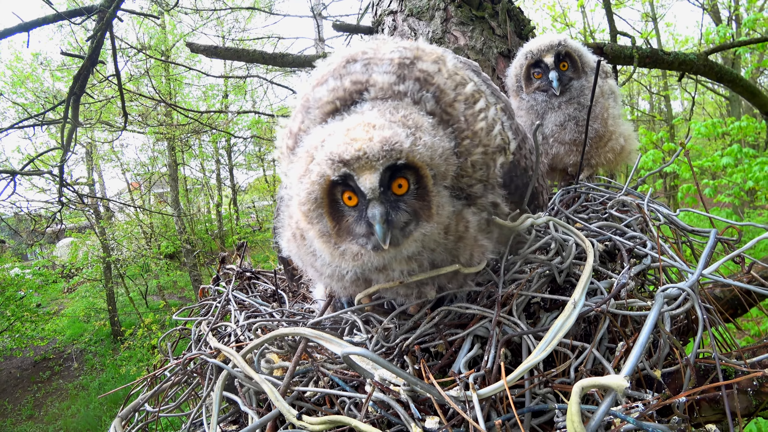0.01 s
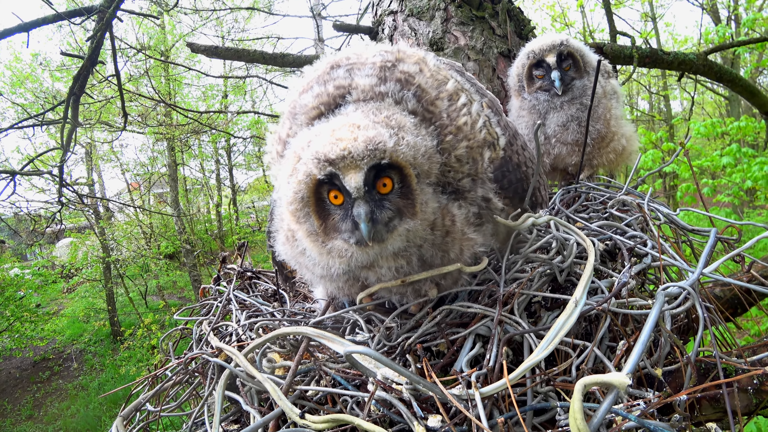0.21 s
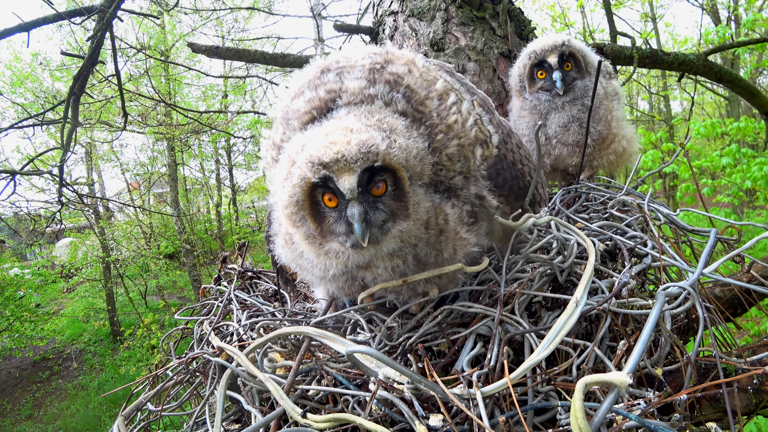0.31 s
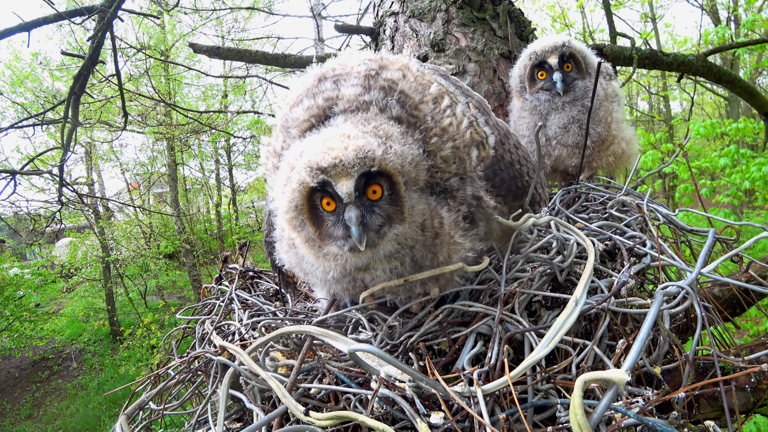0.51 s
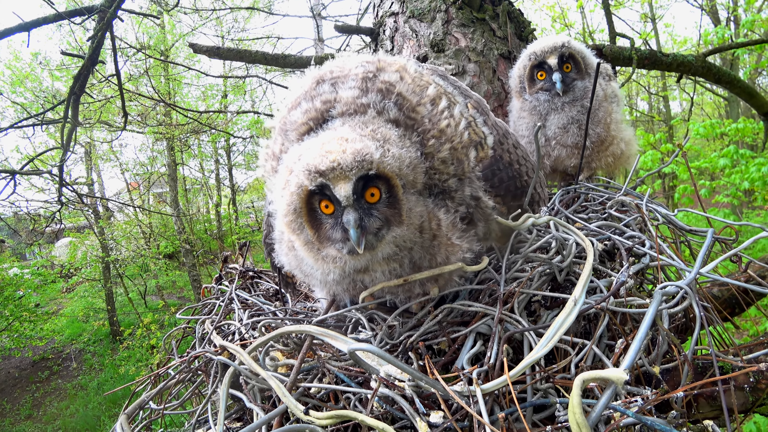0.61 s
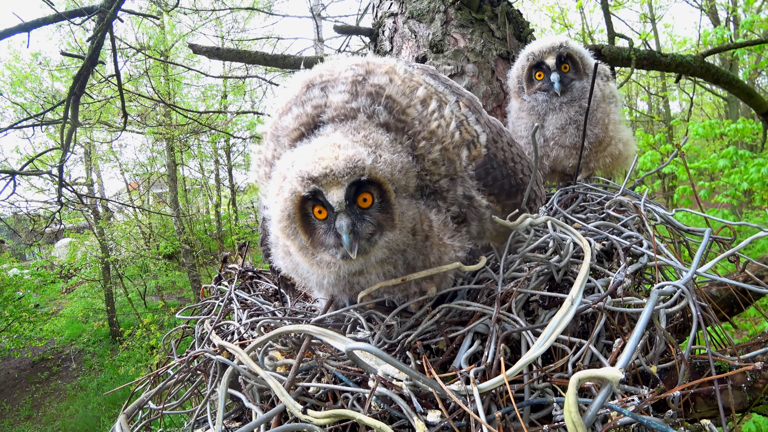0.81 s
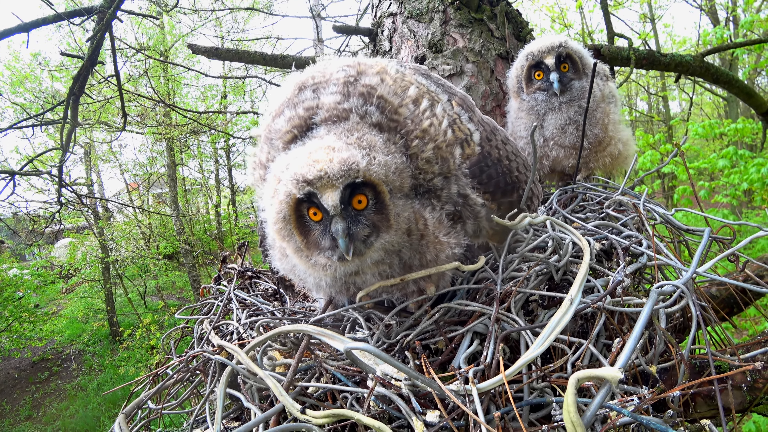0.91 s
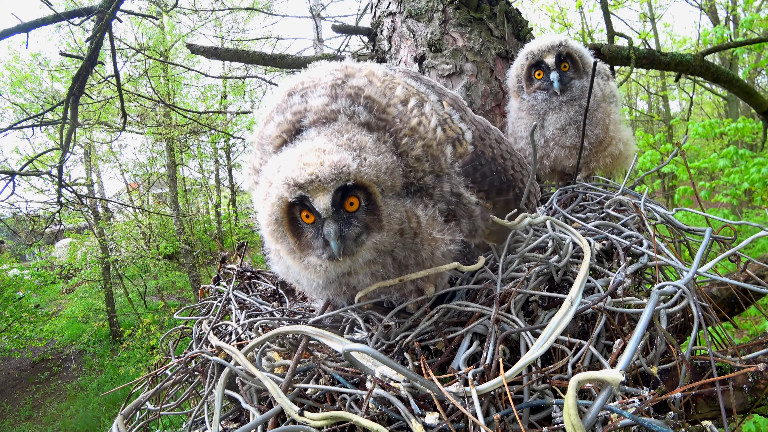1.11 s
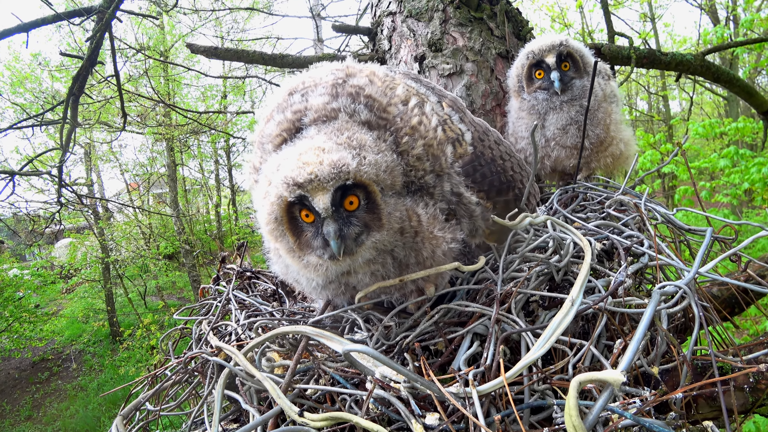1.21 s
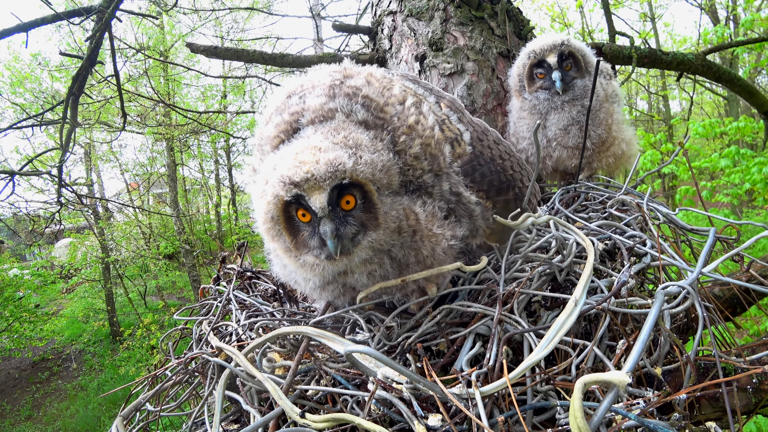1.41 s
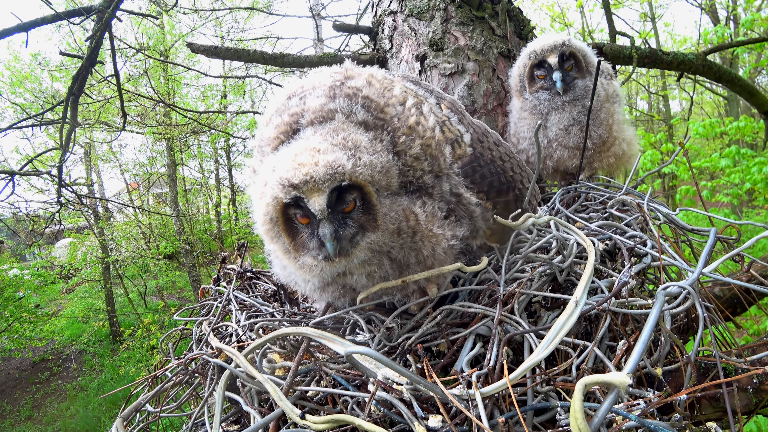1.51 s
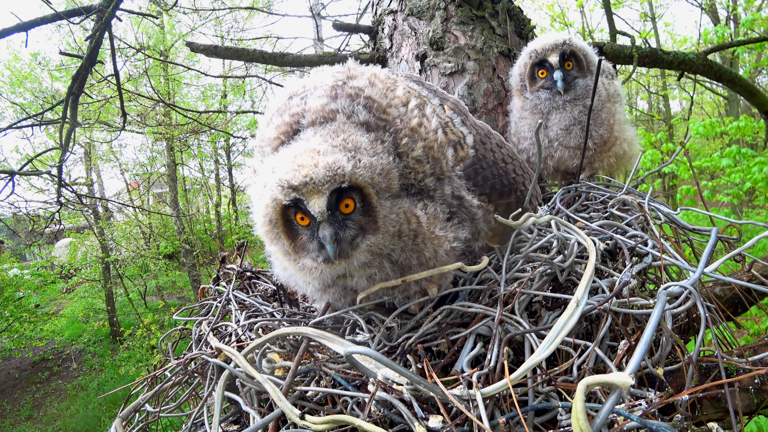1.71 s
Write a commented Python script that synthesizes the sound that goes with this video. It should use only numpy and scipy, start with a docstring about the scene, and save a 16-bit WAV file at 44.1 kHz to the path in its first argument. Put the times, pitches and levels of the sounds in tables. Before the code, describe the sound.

Close owl chick hissing once between two sharp bill snaps, over faint forest air.

```python
"""A low wash of forest air, with a thin on-off whine and small birds far away. Close by, an owl chick
threatens from its twig nest: two light bill ticks, a sharp snap, one long hiss through the open bill,
and a second snap. Each snap is a graze of the bill edges, then the full clap; the hiss is air forced
through the throat, which whistles briefly at each end. The wood gives a faint echo, and two soft hoots
come from deep among the trees."""
import sys
import numpy as np
from scipy import signal
from scipy.fft import rfft, irfft
from scipy.io import wavfile
from scipy.ndimage import uniform_filter1d

SR = 44100
rng = np.random.default_rng(int(sys.argv[2]) if len(sys.argv) > 2 else 0)


def master_out(mix):
    """Clip the mix to full scale and print it as 16-bit PCM to the path in sys.argv[1]."""
    frames = np.transpose(np.atleast_2d(mix))
    ceiling = np.clip(frames, -1, 1)
    pcm = np.round(ceiling * 32767).astype(np.int16)
    wavfile.write(sys.argv[1], SR, pcm)


N = 79380

# Colour of a light touch of the bill, tick or scrape. Each row: frequency in Hz, gain in dB.
TICK_COLOUR = [(100, -48), (600, -39), (1200, -8.5), (2100, -23), (2800, -15), (3300, -19.5), (4800, -9),
               (8500, -12), (15000, -10.5)]


def amp(db):
    """Decibels to amplitude."""
    return 10 ** (np.asarray(db) / 20)


def unit(x):
    """Scales to rms 1."""
    return x / np.sqrt(np.mean(x ** 2) + 1e-20)


def read(points, hz):
    """Reads a curve on a log-frequency axis."""
    f, value = np.transpose(points)
    return np.interp(np.log(hz + 1), np.log(f + 1), value)


def add(mix, start_s, sound):
    """Lays a sound into the stereo mix."""
    part = mix[:, max(round(start_s * SR), 0):][:, :sound.shape[-1]]
    part += sound[..., :part.shape[1]]


def frames(size=512):
    """Times (a column) and frequencies of the short-time grid."""
    t = np.arange(4 * N // size + 5) * size / 4 / SR
    return t[:, None], np.fft.rfftfreq(size, 1 / SR)


def turbulence(gain, likeness, patch_db, flutter_db, size=512):
    """Stereo noise shaped by a gain over time and frequency, with random patches and level flutter."""
    t, hz = frames(size)
    a, b, c, d, patch = rng.standard_normal((5, len(t), len(hz)))
    patch = uniform_filter1d(patch, size=8, axis=0)
    patch = unit(uniform_filter1d(patch, size=7, axis=1))
    flutter = unit(uniform_filter1d(rng.standard_normal(t.shape), size=3, axis=0))
    same = np.clip(read(likeness, hz), -1, 1)
    left = a + 1j * b
    right = same * left + np.sqrt(1 - same ** 2) * (c + 1j * d)
    spectra = np.array([left, right]) * gain * amp(patch_db * patch + flutter_db * flutter)
    return signal.istft(spectra.swapaxes(1, 2), nperseg=size, noverlap=3 * size // 4)[1][:, :N]


def pan(x, balance, lead):
    """Places a source off centre through level and phase differences between left and right."""
    hz = np.fft.rfftfreq(N, 1 / SR)
    half = amp(read(balance, hz) / 2) * np.exp(.5j * read(lead, hz))
    return irfft(rfft(x) * np.array([half, 1 / half]), N)


def forest_air():
    """The wash of the forest, arriving mostly from the right and easing slightly."""
    # Colour of the air. Each row: frequency in Hz, relative level in dB.
    colour = [(20, -44), (40, -31), (80, -25.5), (170, -23), (280, -13), (480, -9), (750, -10), (1080, -2),
              (1500, -9), (2300, -15), (3500, -17.5), (4600, -21), (5900, -23.5), (11000, -26.5),
              (15800, -30)]
    # Stereo width. Each row: frequency in Hz, left-right likeness (1 is mono).
    likeness = [(60, .99), (150, 0.85), (300, 0.73), (600, 0.64), (1100, 0.53), (2000, 0.27), (4000, 0.14),
                (8000, 0.25), (15000, 0.36)]
    # Stereo tilt. Each row: frequency in Hz, left minus right in dB.
    balance = [(200, -0.7), (1000, -0.5), (4000, 0.7)]
    # Direction of arrival. Each row: frequency in Hz, left's lead in radians.
    lead = [(260, 0), (780, -1.16), (1200, -3), (2000, -3), (3600, -.8), (5000, -0.5)]
    fade_db_per_s = -0.8
    t, hz = frames(size=2048)
    gain = amp(read(colour, hz) + fade_db_per_s * t)
    wash = turbulence(gain, likeness, patch_db=1.2, flutter_db=.3, size=2048)
    return amp(-59) * unit(pan(wash, balance, lead))


def whine():
    """A faint high tone switches on and off, perhaps a lens motor."""
    # Spells of whine. Each row: start in seconds, length in seconds.
    spells = [(0, .047), (0.904, 0.04796), (0.954, 0.07), (1.458, 0.087), (1.77, .04)]
    pitch_hz, edge_s = 11267, 0.003
    t = np.arange(N) / SR
    gate = sum(np.clip(np.minimum(t - s, s + length - t) / edge_s, 0, 1) for s, length in spells)
    return amp(-74) * gate * np.sqrt(2) * np.sin(2 * np.pi * pitch_hz * t)


def far_birds():
    """High notes smeared into narrow bands of noise by distance and trees."""
    # Bird notes. Each row: start in seconds, rough length in seconds, pitch in Hz, level in dB.
    notes = [(0.077, 0.18, 3850, -70), (0.267, 0.23, 3900, -64.5), (0.277, 0.1079, 5199, -71),
             (1.258, 0.11, 4480, -68), (1.316, 0.075, 3300, -69), (1.363, 0.1, 4630, -70.5),
             (1.428, 0.045, 3600, -71.5), (1.61, 0.043, 3670, -66)]
    width_hz = 320
    out, hz = np.zeros((2, N)), np.fft.rfftfreq(N, 1 / SR)
    for start, length, pitch, db in notes:
        bell = np.exp(-.5 * ((hz - pitch) / width_hz) ** 2)
        band = unit(irfft(rfft(rng.standard_normal((2, N))) * bell, N))
        age = np.arange(N) / SR / (length / 3)  # the note peaks at age 1
        add(out, start, amp(db) * band * age * np.exp(1 - age))
    return out


def ring(colour, size=2048):
    """The quickest causal ring that has the given colour."""
    log_gain = np.log(amp(read(colour, abs(np.fft.fftfreq(size, 1 / SR)))))
    return np.fft.ifft(np.exp(np.conj(signal.hilbert(log_gain)))).real


def click(colour, scatter_db):
    """One contact of the bill, trailed by a few milliseconds of scatter."""
    delay_s, t60_s = .0004, .0083
    t = np.arange(512) / SR
    scatter = rng.standard_normal(len(t)) * (t > delay_s) * amp(-60 * t / t60_s)
    blow = (t == 0) + amp(scatter_db) * scatter / np.linalg.norm(scatter)
    return np.convolve(blow / np.linalg.norm(blow), ring(colour))


def bill_ticks():
    """Light ticks as the bill parts."""
    # The ticks. Each row: start in seconds, gain in dB.
    ticks = [(0.135, -23), (.1640, 0)]
    out = np.zeros((2, N))
    for start, db in ticks:
        add(out, start, amp(db) * click(TICK_COLOUR, scatter_db=-9))
    return out


def bill_snaps():
    """The edges graze and slide into contact, then the halves clap shut and push out a puff of air."""
    # The snaps. Each row: clap time in seconds, clap gain in dB, the graze's head start in seconds,
    # graze gain in dB, puff gain in dB.
    snaps = [(0.2168, 0.5, 0.0052, -1, -8), (1.0827, 1.5, 0.0056, -1.5, -1.5)]
    # Thin, bright colour of the graze. Each row: frequency in Hz, gain in dB.
    graze_colour = [(100, -40), (800, -54), (1500, -35), (2100, -7), (3000, -2), (3900, -5), (4900, 1),
                    (5600, -3), (6500, -1), (9300, -11.5), (15000, -19.5)]
    # Full-bodied colour of the clap. Each row: frequency in Hz, gain in dB.
    clap_colour = [(80, -11.5), (450, -0.5), (700, 4), (1100, 13), (1500, 11.5), (1900, 12.5), (2400, 11),
                   (2850, 11.5), (3700, 2.5), (4750, 8.5), (5500, 3.5), (6200, 4.5), (8200, -1),
                   (9200, -12.5), (10400, 2.5), (13000, -9), (16000, -13)]
    puff_hz, scrape_s, smear = 480, .0007, .68
    puff = signal.lfilter(*signal.butter(2, puff_hz, fs=SR), signal.unit_impulse(1024))
    out = np.zeros((2, N))
    for clap_s, clap_db, lead_s, graze_db, puff_db in snaps:
        clap = click(clap_colour, scatter_db=-16)
        clap = signal.lfilter([-smear, 1], [1, -smear], clap)  # an all-pass blurs the attack
        friction = rng.standard_normal(256) * (np.arange(256) / SR < scrape_s)
        scrape = np.convolve(friction, ring(TICK_COLOUR))
        add(out, clap_s - lead_s, amp(graze_db) * click(graze_colour, scatter_db=-11.5))
        add(out, clap_s - scrape_s, amp(-16) * scrape)
        add(out, clap_s, amp(clap_db) * clap)
        add(out, clap_s, amp(puff_db) * puff)
    return out


def wood_echo(x):
    """Quick reflections from the nest, then a faint tail from the trees."""
    # Decay of the tail. Each row: frequency in Hz, seconds to fall 60 dB.
    t60 = [(200, .25), (1500, .26), (5000, .27), (12000, .12)]
    # Colour of the tail. Each row: frequency in Hz, relative level in dB.
    colour = [(200, -4), (1500, 0), (5000, 0), (7500, 1), (10000, -7), (13000, -8)]
    nest_t60_s, tail_delay_s, size = .06, .011, SR // 2
    hz, t, spectra = signal.stft(rng.standard_normal((2, size)), SR, nperseg=256)
    spectra *= amp(read(colour, hz)[:, None] - 60 * t / read(t60, hz)[:, None])
    tail = signal.istft(spectra, SR, nperseg=256)[1][:, :size]
    spikes = rng.standard_normal(tail.shape) ** 3  # cubing makes single reflections stand out
    nest = spikes * amp(-60 * np.arange(size) / SR / nest_t60_s)
    echo = amp(-32) * nest / np.linalg.norm(nest[0])
    add(echo, tail_delay_s, amp(-33) * tail / np.linalg.norm(tail[0]))
    return signal.fftconvolve(x, echo, axes=1)[:, :N]


def hiss():
    """Air forced through the throat in one arch; the treble swells first and dies as pressure drops."""
    # Resonances of the throat and open bill. Each row: frequency in Hz, relative level in dB.
    resonances = [(100, -43), (400, -29.5), (750, -14), (1050, -6.5), (1400, 1), (2000, 1), (2450, -4),
                  (2900, -2), (3400, -8.5), (4700, -7), (5700, -12.5), (6600, -5.5), (8300, -2), (9450, -2),
                  (9950, -10), (11100, -1.5), (12500, -8), (14000, -8), (15700, -12.5)]
    # Stereo width. Each row: frequency in Hz, left-right likeness (1 is mono).
    likeness = [(100, 1), (700, 1), (1400, 1), (3100, 0.98), (6800, 1), (12000, .998)]
    start_s, low_end_s, treble_end_s = .343, .930, .915
    glottis_s = .04  # the airway opens and shuts this quickly
    t, hz = frames()
    treble = read([(2000, 0), (7000, 1)], hz)  # blends each pair below from lows to highs
    end_s = np.interp(treble, [0, 1], [low_end_s, treble_end_s])
    skew = np.interp(treble, [0, 1], [1.04, .95])
    steepness = np.interp(treble, [0, 1], [1.2, 1.05])
    progress = np.clip((t - start_s) / (end_s - start_s), 0, 1)
    arch = abs(np.sin(np.pi * progress ** skew))
    opening = np.clip(np.minimum(t - start_s, end_s - t) / glottis_s, 0, 1)
    flow = opening * arch ** steepness
    mouth_shift = 1 + 0.014 * (1 - arch)  # the resonances sit slightly lower at both ends
    throat = amp(read(resonances, hz * mouth_shift))
    breath = turbulence(flow * throat, likeness, patch_db=0.93, flutter_db=0.54)
    share = np.sqrt((low_end_s - start_s) * SR / N / 2)  # allows for the silence around the hiss
    return amp(-32.5) * share * unit(breath)


def throat_whistles():
    """The nearly closed throat whistles for an instant at each end of the hiss."""
    # The whistles. Each row: start in seconds, length in seconds, first and last pitch in Hz,
    # level in dB, the octave's relative level in dB.
    whistles = [(0.352, .018, 5500, 6100, -58, -3), (0.869, 0.066, 916, 933, -58, -42)]
    out = np.zeros((2, N))
    for start, length, first_hz, last_hz, db, octave_db in whistles:
        progress = np.arange(0, length, 1 / SR) / length
        phase = 2 * np.pi * np.cumsum(first_hz + (last_hz - first_hz) * progress) / SR
        tone = np.sqrt(2) * (np.sin(phase) + amp(octave_db) * np.sin(2 * phase))
        add(out, start, amp(db) * np.sin(np.pi * progress) * tone)
    return out


def far_hoots():
    """Soft notes that rise and fall, far off among the trees."""
    # The hoots. Each row: start in seconds, length in seconds, end and top pitch in Hz, level in dB.
    hoots = [(.84, .42, 522, 536, -75), (1.33, .38, 608, 665, -71.5)]
    out = np.zeros((2, N))
    for start, length, end_hz, top_hz, db in hoots:
        progress = np.arange(0, length, 1 / SR) / length
        arch = np.sin(np.pi * progress ** 1.2)
        phase = 2 * np.pi * np.cumsum(end_hz + (top_hz - end_hz) * arch) / SR
        add(out, start, amp(db) * np.sqrt(2 * abs(arch)) * np.sin(phase))
    return out


def scene():
    """The chick close up and a little off centre, with the forest behind it."""
    # The chick's stereo tilt. Each row: frequency in Hz, left minus right in dB.
    balance = [(150, -.3), (350, 0), (700, 1), (1290, 2.4), (2400, 0.5517), (5000, 0.2), (10000, 0)]
    # The chick's direction. Each row: frequency in Hz, left's lead in radians.
    lead = [(100, -0.17), (400, -0.6), (1030, -0.51), (2000, -0.48), (2600, -0.17), (6000, -0.17),
            (12000, -0.17)]
    chick = pan(bill_ticks() + bill_snaps() + hiss() + throat_whistles(), balance, lead)
    return chick + wood_echo(chick) + forest_air() + far_birds() + far_hoots() + whine()


def record(dry):
    """A steep low-pass trims the very top of the treble."""
    lowpass = signal.firwin(255, cutoff=15950, window=("kaiser", 8), fs=SR)
    return signal.oaconvolve(dry, lowpass[None], "same")


dry = scene()
out = record(dry)
master_out(out)
```